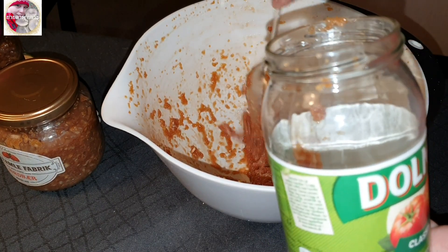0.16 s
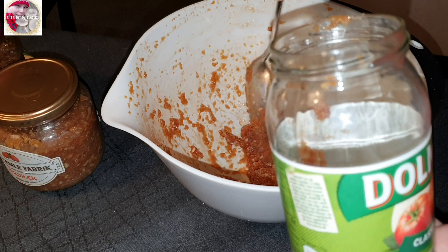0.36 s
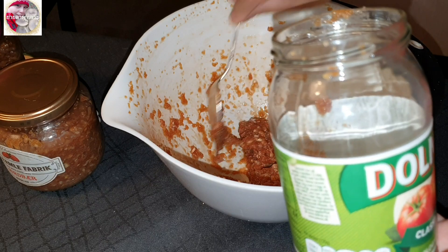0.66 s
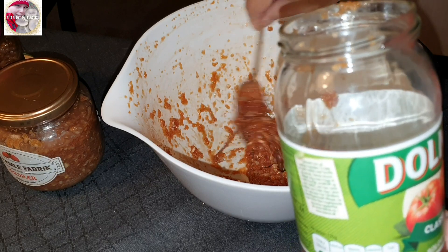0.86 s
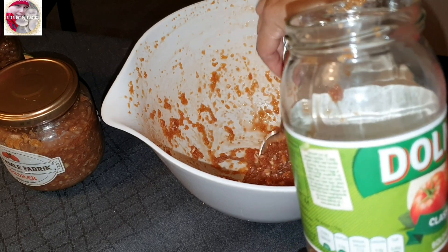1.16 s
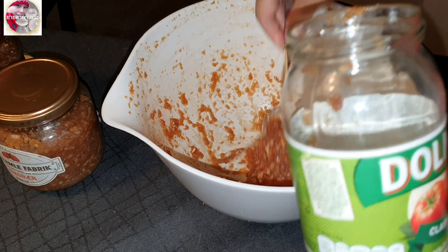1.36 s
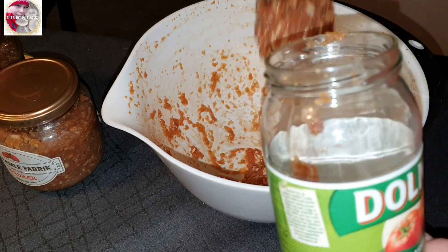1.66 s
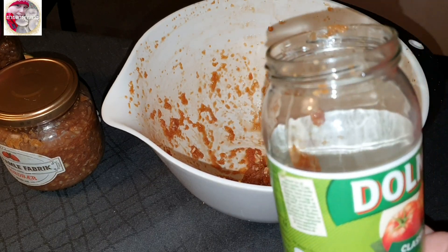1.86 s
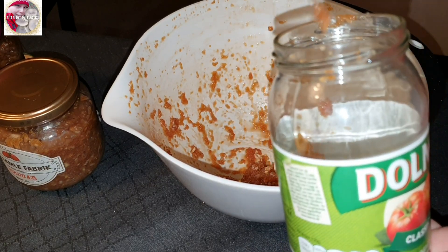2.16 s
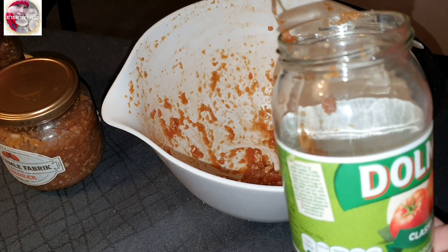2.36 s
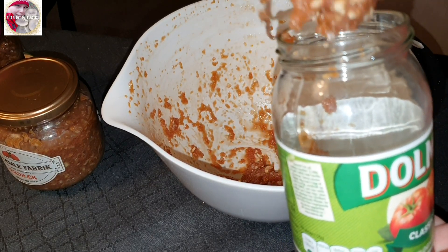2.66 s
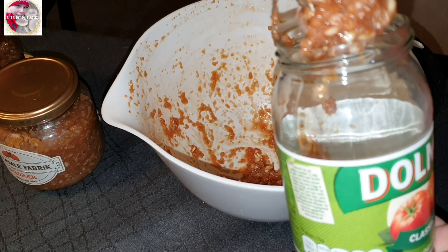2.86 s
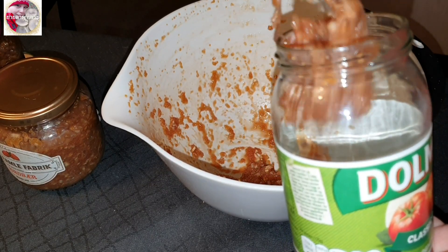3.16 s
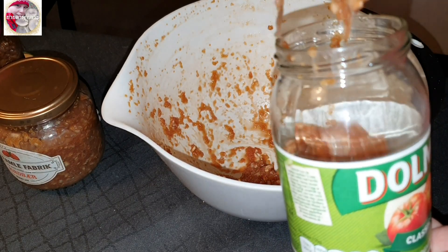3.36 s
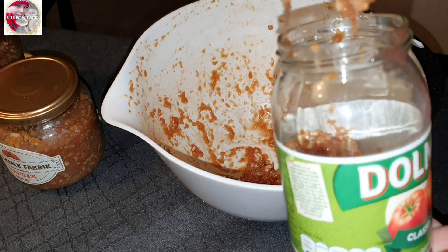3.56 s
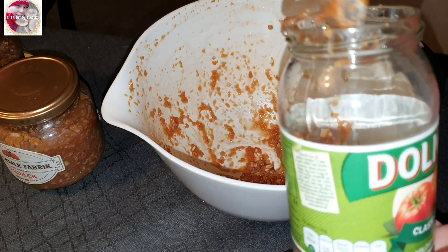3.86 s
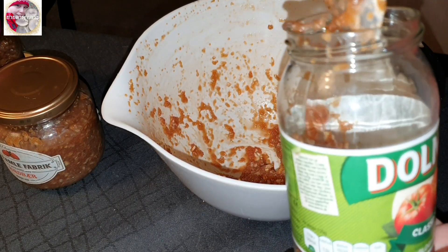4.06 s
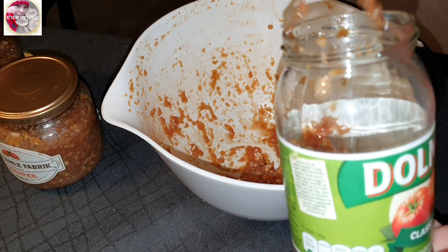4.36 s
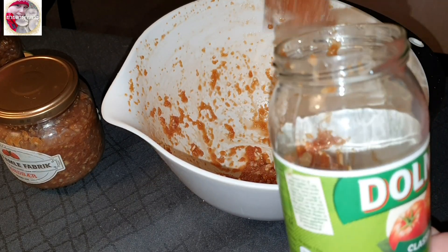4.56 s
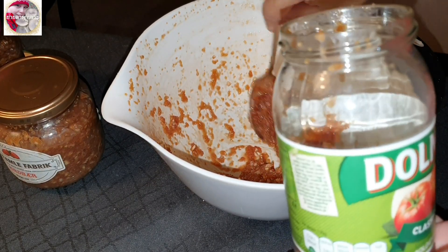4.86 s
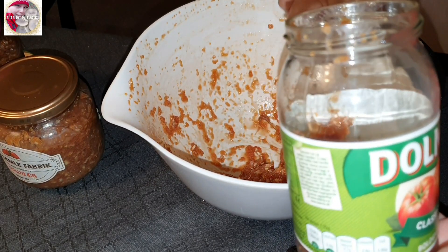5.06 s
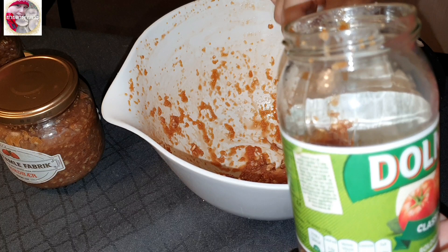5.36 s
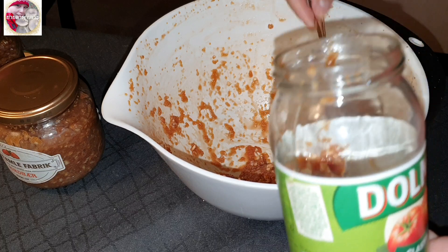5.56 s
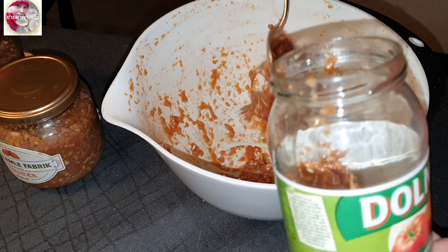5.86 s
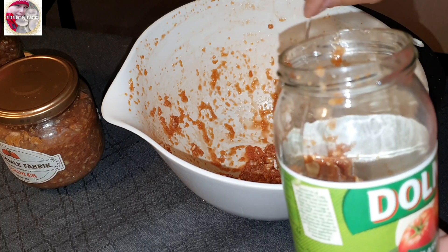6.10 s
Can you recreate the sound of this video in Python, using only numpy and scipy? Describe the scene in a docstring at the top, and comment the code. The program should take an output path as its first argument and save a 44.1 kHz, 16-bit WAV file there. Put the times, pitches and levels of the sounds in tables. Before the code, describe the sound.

A metal spoon knocks and scrapes wet relish in a plastic bowl, then clinks twice on a glass jar and scrapes again.

```python
"""A small kitchen, heard from a close pair of microphones, with a faint appliance hum throughout.
Fingers rub on a glass jar. At 0.7 s a metal spoon knocks a plastic mixing bowl into ringing, then
sticks and slips along its wall, scraping up wet relish. After 3 s the spoonful slides into the jar
with tiny wet pops, and at 4 s the spoon clinks twice on the rim. From 4.8 s it is back in the bowl,
knocking and scraping again."""
import sys
import numpy as np
from scipy import signal
from scipy.fft import rfft, irfft
from scipy.io import wavfile

SR = 44100
rng = np.random.default_rng(int(sys.argv[2]) if len(sys.argv) > 2 else 0)


def waveform_to_disk(signal):
    """Save audio, clipped to [-1, 1], as 16-bit WAV at the path in sys.argv[1]."""
    frames = np.transpose(np.atleast_2d(signal))
    scaled = np.clip(frames, -1, 1) * 32767
    samples = np.round(scaled).astype(np.int16)
    wavfile.write(sys.argv[1], SR, samples)


N = 274743
T = np.arange(N) / SR


def gain_of(db):
    """Decibels to amplitude."""
    return 10 ** (np.asarray(db) / 20)


def unit_rms(x):
    """Scales to rms 1."""
    return x / np.sqrt(np.mean(x ** 2) + 1e-20)


def curve_at(points, hz):
    """Reads a table on a log-frequency axis."""
    points_hz, values = np.transpose(points)
    return np.interp(np.log(hz + 1), np.log(points_hz + 1), values)


def panned(db):
    """Gains that put the left microphone db above the right."""
    return gain_of([[db / 2], [-db / 2]])


def add(mix, start_s, sound):
    """Mixes a sound in at start_s."""
    part = mix[:, round(start_s * SR):][:, :sound.shape[-1]]
    part += sound[..., :part.shape[1]]


def through(x, response):
    """Convolves each channel with a response."""
    return signal.fftconvolve(np.atleast_2d(x), np.atleast_2d(response), axes=1)[:, :x.shape[-1]]


def filtered(x, hz, kind, order=2):
    """Butterworth filter."""
    sections = signal.butter(order, np.minimum(hz, SR / 2 - 1), kind, fs=SR, output="sos")
    return signal.sosfilt(sections, x)


def click(spectrum, size=4096):
    """The shortest causal pulse with this spectrum, energy 1."""
    log_gain = np.log(gain_of(curve_at(spectrum, abs(np.fft.fftfreq(size, 1 / SR)))))
    minimum_phase = np.exp(np.conj(signal.hilbert(log_gain)))
    pulse = np.fft.ifft(minimum_phase).real[:size // 2]
    return pulse / np.linalg.norm(pulse)


def wander(below_hz):
    """Slow random motion of rms 1."""
    slow = np.fft.rfftfreq(N, 1 / SR) < below_hz
    return unit_rms(irfft(rfft(rng.standard_normal(N)) * slow, N))


# Likeness of the sound at the two microphones: frequency_hz, correlation
MIC_LIKENESS = [(50, 1), (130, 0.5), (500, 0.49), (1000, 0), (2000, 0), (16000, 0.047)]

def microphone_pair(spectra, hz):
    """Long waves reach two close microphones alike; short ones arrive unrelated."""
    likeness = np.clip(curve_at(MIC_LIKENESS, hz), -1, 1)
    return np.array([spectra[0], likeness * spectra[0] + np.sqrt(1 - likeness ** 2) * spectra[1]])


# Still kitchen air: frequency_hz, level_db
AIR_SPECTRUM = [(25, -20), (38, -12), (55, -4.5), (110, -15), (180, -12), (310, -21.5), (430, -26),
                (850, -25), (1400, -34), (2500, -29.5), (4000, -34.5), (7000, -41), (15600, -44.5),
                (16200, -73.5)]
# Peaks in the microphone hiss: centre_hz, width_hz, boost_db
MIC_HISS = [(2520, 100, 1), (5020, 400, 9.5), (8670, 320, 8)]
# Partials of the appliance hum: pitch_hz, level_db
APPLIANCE_HUM = [(48.8, -78.5), (97.6, -70.5), (146.4, -87), (195.2, -82.5), (244, -83), (293, -87),
                 (733, -105), (782, -92.5)]

def room_tone(air_db=-72):
    """Still room air, microphone hiss and a wavering appliance hum."""
    hz = np.fft.rfftfreq(N, 1 / SR)
    hiss_db = sum(db * np.exp(-((hz - centre) / width) ** 2) for centre, width, db in MIC_HISS)
    noise = microphone_pair(rfft(rng.standard_normal((2, N))), hz)
    air = unit_rms(irfft(noise * gain_of(curve_at(AIR_SPECTRUM, hz) + hiss_db), N))
    hum = np.zeros(N)
    for pitch_hz, db in APPLIANCE_HUM:
        amplitude = np.sqrt(2) * gain_of(db + 1.5 * wander(below_hz=2.5))
        hum += amplitude * np.sin(2 * np.pi * pitch_hz * T + 0.43 * wander(below_hz=18))
    return panned(0.095) * (air * gain_of(air_db + .7 * wander(below_hz=3.1)) + hum)


def slips(per_s, spread_db):
    """Tiny stick-slip releases of uneven size come in clumps, a separate train for each side."""
    sides = []
    for _ in range(2):
        size = gain_of(spread_db * np.minimum(rng.exponential(1, N), 4))
        sign = rng.choice([-1, 1], N)
        released = rng.random(N) < per_s / SR
        clumps = gain_of(3 * wander(below_hz=110))
        sides.append(unit_rms(size * sign * released * clumps))
    return np.array(sides)


# The hand shifts its grip on the jar: middle_s, half_length_s, level_db
GRIP_SHIFTS = [(0.084, 0.23, -66.5), (0.457, 0.034, -67), (1.42, 0.11, -65), (4.42, 0.16, -69.5),
               (6.099, 0.2, -68.5)]
# Skin rubbing on glass: frequency_hz, level_db
SKIN_SPECTRUM = [(100, -1.5), (310, 5), (450, -5), (1000, -19), (2500, -15.5), (5000, -27.5),
                 (15000, -45.5)]

def finger_rubs():
    """Fingers stick and slip softly on the jar as their pressure swells and fades."""
    pressure = sum(gain_of(db) * np.exp(-((T - s) / half_s) ** 2) for s, half_s, db in GRIP_SHIFTS)
    return pressure * unit_rms(through(slips(per_s=1400, spread_db=5), click(SKIN_SPECTRUM)))


# Smacks and plops of the relish: start_s, level_db, centre_hz, t60_s
RELISH_SMACKS = [(0.069, -66, 5860, 0.07), (1.0557, -59.5, 4400, 0.21), (1.277, -68, 9300, 0.1),
                 (1.375, -76, 12000, 0.11), (3.242, -67.5, 5300, 0.037), (3.357, -73, 5350, 0.068),
                 (3.416, -76.5, 7800, 0.14), (3.591, -63.5, 412, 0.13), (4.736, -58, 3350, 0.026)]

def relish_smacks():
    """Wet food parts or lands in a quick cluster of tiny pops."""
    out, t = np.zeros((2, N)), T[:SR // 2]
    for start_s, db, hz, t60_s in RELISH_SMACKS:
        spikes = rng.standard_normal((2, len(t))) ** 3
        pops = filtered(spikes, [hz / 1.35, hz * 1.23], "band")
        add(out, start_s, gain_of(db - 60 * t / t60_s) * unit_rms(pops))
    return out


def ring(hz, db, t60_s):
    """One dying mode."""
    t = T[:SR // 2]
    return gain_of(db - 60 * t / t60_s) * np.sin(2 * np.pi * hz * t)


# Modes of the plastic bowl: pitch_hz, level_db, t60_s
BOWL_MODES = [(101.9, -4, 0.17), (130, 0.5, 0.12), (207.2, -16.5, .12), (259.3, -10.5, 0.13),
              (319.5, -18.5, 0.56), (464.3, -5.5, 0.13), (511, -3.5, 0.17), (545.7, 1, 0.044),
              (638, -3, 0.1), (697, -7, 0.094), (956, -14, .1), (1194, -17, 0.061), (1670, -9, 0.045),
              (1930, -3.5, 0.051), (1971, 2.5, .035), (2320, -4.5, 0.01), (2736, -5, 0.021),
              (3480, -2, 0.028), (4900, -6.5, 0.024), (6850, -3, 0.0075)]

def bowl_ring(apart_hz=1500):
    """The bowl rings; its high modes reach each microphone with their own sign."""
    body = np.zeros((2, SR // 2))
    for k, (hz, db, t60_s) in enumerate(BOWL_MODES):
        left_sign = (-1) ** k
        right_sign = (-1) ** (k // 2) if hz > apart_hz else left_sign
        body += np.outer([left_sign, right_sign], ring(hz, db, t60_s))
    return body


def rattle(chatter_db, t60_s):
    """The force of a contact followed by a brief fading chatter."""
    t = T[:SR // 2]
    force = gain_of(chatter_db - 60 * t / t60_s) * rng.standard_normal((2, len(t)))
    force[:, 0] = 1
    return force


def bounces(time_s, rebounds, gap_s, first_db=-6.5, step_db=-1, cushion_db=-17, gap_ratio=.68):
    """A blow and its ever quicker, weaker rebounds, which crack less because food cushions them."""
    contacts = [(time_s, 0, 0)]
    for k in range(round(rebounds)):
        time_s += gap_s * gap_ratio ** k
        contacts.append((time_s, first_db + k * step_db, cushion_db))
    return contacts


# Spoon on bowl: start_s, ring_db, hardness_cutoff_hz, crack_db, thud_db, thud_low_cut_hz,
# rebound_count (rounded; none if negative), first_gap_s
SPOON_KNOCKS = [(0.7107, -27, 10960, -9, -4.5, 82, 3.5, .017), (1.051, -47.5, 2140, -34.5, -55, 100, 2, 0),
                (1.155, -47.5, 2520, -38, -48, 100, -1, 0), (4.8134, -77, 7000, -39.5, -18.5, 50, 1, 0),
                (4.8500, -35.5, 4260, -15, -8.5, 40, 0.5, 0), (5.104, -59, 2100, -32, -35, 100, -0.5, 0),
                (5.560, -54.5, 2000, -48, -18.5, 40, 0.5, .045),
                (5.995, -74.5, 3000, -48, -57, 99, -1.5, 0)]
# Bare metal cracking on plastic: frequency_hz, level_db
CRACK_SPECTRUM = [(150, -20), (330, -8.5), (500, 6.5), (850, -10.5), (1300, -8.5), (2000, 6.5), (3000, -3),
                  (4400, -3.5), (6700, -9), (8000, -15), (11000, -15.5), (16000, -20)]
# The bowl's thud into the worktop: frequency_hz, level_db
THUD_SPECTRUM = [(25, -19), (55, -5), (78, -9), (102, 4.5), (130, 2), (200, -13), (270, -4.5), (450, -28),
                 (1500, -60), (16000, -88)]

def bowl_knocks():
    """The spoon cracks on the plastic, rings the bowl and thuds it into the worktop."""
    out, body = np.zeros((2, N)), bowl_ring()
    thud = panned(-1.9) * click(THUD_SPECTRUM)
    for start_s, ring_db, hardness_hz, crack_db, thud_db, low_cut_hz, rebounds, gap_s in SPOON_KNOCKS:
        for time_s, loss_db, cushion_db in bounces(start_s, rebounds, gap_s):
            contact = rattle(chatter_db=-10.5, t60_s=0.0043) + rattle(chatter_db=-23, t60_s=0.14)
            crack = gain_of(crack_db + cushion_db) * through(contact, click(CRACK_SPECTRUM))
            crack[1] = np.roll(crack[1], 2)  # the bowl is nearer the left microphone
            blow = gain_of(ring_db) * body + panned(3.1) * crack
            add(out, time_s, gain_of(loss_db) * filtered(blow, hardness_hz, "low"))
            add(out, time_s, gain_of(thud_db + loss_db) * filtered(thud, low_cut_hz, "high"))
    return out


def stroke_pressure(start_s, length_s, press_s=0.037, ease_db_per_s=38, lift_db_per_s=304):
    """The edge digs in just before the stroke, the hand eases off along it and the spoon lifts away."""
    t = T - start_s
    press = np.clip(t / press_s + 1, 0, 1) ** 2
    ease_db = ease_db_per_s * np.clip(t, 0, length_s)
    lift_db = lift_db_per_s * np.maximum(t - length_s, 0)
    return press * gain_of(-ease_db - lift_db)


# The spoon's edge grating on plastic: frequency_hz, level_db
GRIT_SPECTRUM = [(300, -31), (700, 4), (950, 6), (1200, 10.5), (1400, 2.5), (1650, 6), (2100, 8), (3000, 1),
                 (3800, 3), (7000, -6.5), (15000, -30.5)]

def edge_grit(force, strokes, treble_floor_db=-9):
    """Slip length sets a step in the treble that glides from stroke to stroke at an even level."""
    hz, t, spectra = signal.stft(force, SR, nperseg=512)
    start_s, length_s, _, bite_hz, _, _ = np.transpose(strokes)
    cutoff_hz = np.interp(t, start_s + length_s / 2, bite_hz)
    shelf = gain_of(treble_floor_db) + 1 / np.sqrt(1 + (hz[:, None] / cutoff_hz) ** 20)
    colour = gain_of(curve_at(GRIT_SPECTRUM, hz[:, None])) * shelf
    colour /= np.linalg.norm(colour, axis=0)
    return signal.istft(spectra * colour, SR, nperseg=512)[1][:, :N]


# Scraping strokes: start_s, length_s, grit_db, bite_cutoff_hz, wall_over_grit_db, fizz_over_grit_db
SPOON_STROKES = [(0.776, 0.11, -43, 5410, 3, -18.5), (0.91, 0.039, -43.5, 3800, 1, -34),
                 (1.006, 0.11, -58, 2392, 3.5, -23), (1.154, .03, -55.5, 2593, 7, -33),
                 (1.256, .06, -73, 2660, -8, -13), (1.334, .14, -79, 2966, -10, 1),
                 (4.873, 0.018, -47, 2613, -1.5, -23), (4.927, 0.065, -45, 4000, -4, -19),
                 (5.115, .12, -51.5, 2285, -1, -40), (5.296, 0.038, -51.5, 4360, -4, -30),
                 (5.376, .02, -56, 3410, -1, -27), (2.43, 0.026, -81, 3000, -7, -9),
                 (5.998, .015, -65, 2480, -15, -20)]
# The wet film tearing: frequency_hz, level_db
FIZZ_SPECTRUM = [(3000, -43), (5500, 15), (6800, 5), (8000, 3.5), (10000, 6.5), (15500, -10)]

def bowl_scrapes(modes_db=-6):
    """The dragged spoon grates, drives the bowl's wall and tears the wet film."""
    out, force = np.zeros((2, N)), slips(per_s=1600, spread_db=4)
    ringing = through(force + .5 * force[::-1], bowl_ring())  # each side also drives the other
    upper_modes = unit_rms(filtered(ringing, [1050, 2300], "band", order=4))
    grating = unit_rms(edge_grit(force, SPOON_STROKES))
    grit = panned(1.8) * unit_rms(grating + gain_of(modes_db) * upper_modes)
    wall = unit_rms(filtered(ringing, [300, 620], "band"))
    fizz = panned(2.4) * unit_rms(through(slips(per_s=780, spread_db=-10), click(FIZZ_SPECTRUM)))
    for start_s, length_s, grit_db, _, wall_db, fizz_db in SPOON_STROKES:
        scrape = grit + gain_of(wall_db) * wall + gain_of(fizz_db) * fizz
        out += gain_of(grit_db) * stroke_pressure(start_s, length_s) * scrape
    return out


# The edge judders on the plastic: start_s, length_s, first_pitch_hz, last_pitch_hz, level_db
SPOON_JUDDERS = [(0.9, 0.021, 432, 398, -36.5), (0.905, 0.026, 317, 323, -37),
                 (1.172, 0.037, 463, 595, -43), (1.241, 0.071, 560.3, 569, -55.5),
                 (5.21, 0.036, 542, 438, -45.5)]

def spoon_judders(overtone_db=-17):
    """For a moment the slips fall into step and the bowl groans."""
    out = np.zeros((2, N))
    for start_s, length_s, first_hz, last_hz, db in SPOON_JUDDERS:
        n = int(length_s * SR)
        speed = 1 + .04 * wander(below_hz=250)[:n]
        phase = 2 * np.pi * np.cumsum(np.linspace(first_hz, last_hz, n) * speed) / SR
        overtones = sum(np.sin(k * phase) / (k - 1) for k in range(2, 5))
        groan = np.sin(phase) + gain_of(overtone_db) * overtones
        add(out, start_s, gain_of(db) * groan * signal.windows.tukey(n, .7))
    return out


# Spoon on the jar's rim: start_s, ring_db, tick_db
RIM_TAPS = [(3.9997, -30.5, -32.5), (4.0660, -25, -20.5)]
# Modes of the glass jar, damped by the hand: pitch_hz, level_db, t60_s, left_over_right_db
JAR_MODES = [(505, -22, 0.15, -7.5), (1289, -12, 0.022, 3.5), (2850, -2.5, 0.083, -5),
             (2787, -14, 0.041, -5.5), (4590, -13.5, 0.038, 11.5), (4496, -14.5, 0.0437, -6.5),
             (4742, -8.5, 0.04, 4), (4808, -11.5, 0.095, 6.5), (10550, -20.5, .025, -1.5),
             (10110, -16, 0.033, -5.5)]
# Metal touching glass: frequency_hz, level_db
TICK_SPECTRUM = [(150, -7), (500, -1), (1100, 4), (1700, 1), (3000, -2), (4800, -2), (5800, -12),
                 (8000, -20), (10500, -16), (12500, -27), (16000, -35)]

def jar_clinks(ceiling_s=.0325, ceiling_db=-9):
    """The spoon taps the rim: a tick, then close pairs of glass modes beat and echo off the ceiling."""
    rings, ticks = np.zeros((2, 2, N))
    glass = sum((-1) ** (k // 2) * panned(pan_db) * ring(hz, db, t60_s)
                for k, (hz, db, t60_s, pan_db) in enumerate(JAR_MODES))
    for start_s, ring_db, tick_db in RIM_TAPS:
        contact = rattle(chatter_db=0, t60_s=0.0087) + rattle(chatter_db=-25.5, t60_s=0.043)
        add(rings, start_s, gain_of(ring_db) * glass)
        add(ticks, start_s, gain_of(tick_db) * panned(-1.7) * through(contact, click(TICK_SPECTRUM)))
    heard = kitchen(rings, tail_db=-6, echo_db=-13)
    add(heard, ceiling_s, gain_of(ceiling_db) * filtered(rings, [2000, 4600], "band"))
    return heard + kitchen(ticks, tail_db=-7.5, echo_db=-8)


# Decay of the small kitchen: frequency_hz, t60_s
KITCHEN_DECAY = [(100, 0.85), (500, 0.3), (2000, 0.22), (5000, 0.34), (10000, 0.26), (16000, .22)]
# Reflections from the worktop and walls: delay_s, level_db
NEAR_ECHOES = [(.0034, -11), (.0068, -18), (.0095, -14.5), (.0185, -13)]

def kitchen(direct, tail_db, echo_db, dull_hz=6000, low_cut_hz=200, build_s=0.009):
    """The close sound, then a few distinct, duller echoes and a short diffuse tail with little bass."""
    hz, t, noise = signal.stft(rng.standard_normal((2, SR)), SR, nperseg=256)
    decay = gain_of(-60 * t / curve_at(KITCHEN_DECAY, hz[:, None]))
    tail = signal.istft(microphone_pair(noise, hz[:, None]) * decay, SR, nperseg=256)[1][:, :SR]
    tail = filtered(tail * np.clip(T[:SR] / build_s, 0, 1), low_cut_hz, "high", order=1)
    echoes = np.zeros((2, SR))
    for k, (delay_s, db) in enumerate(NEAR_ECHOES):
        left_at = round(delay_s * SR)
        right_at = left_at + 3 * (-1) ** k  # echoes arrive from alternate sides
        echoes[0, left_at] = echoes[1, right_at] = gain_of(db + echo_db)
    response = gain_of(tail_db) * tail / np.linalg.norm(tail[0]) + filtered(echoes, dull_hz, "low")
    response[:, 0] = 1
    return through(direct, response)


def scene():
    """Bowl, relish and jar close to the microphones, with the kitchen around them."""
    knocks = kitchen(bowl_knocks(), tail_db=-3, echo_db=-9)
    scooping = kitchen(bowl_scrapes() + spoon_judders() + relish_smacks(), tail_db=-3, echo_db=-9)
    return knocks + scooping + jar_clinks() + finger_rubs() + room_tone()


def record(dry):
    """The recorder's bass roll-off and band limit."""
    low_cut_hz, top_hz = 27, 16400
    band_limit = signal.firwin(511, top_hz, window=("kaiser", 9), fs=SR)
    return signal.oaconvolve(filtered(dry, low_cut_hz, "high", order=4), band_limit[None], "same")


dry = scene()
out = record(dry)
waveform_to_disk(out)
```